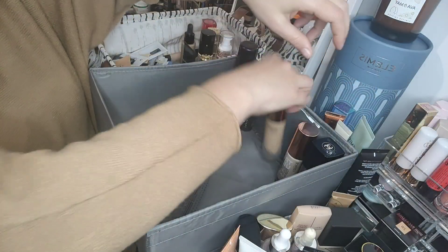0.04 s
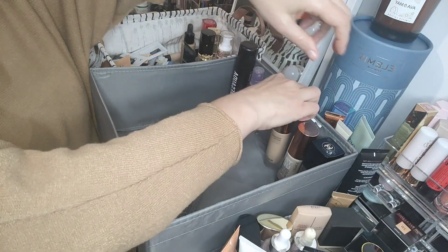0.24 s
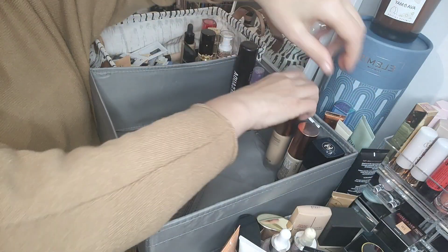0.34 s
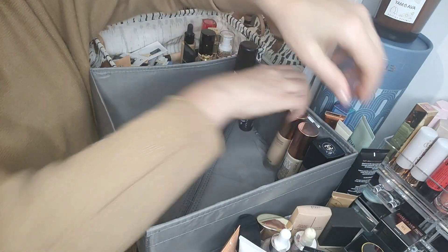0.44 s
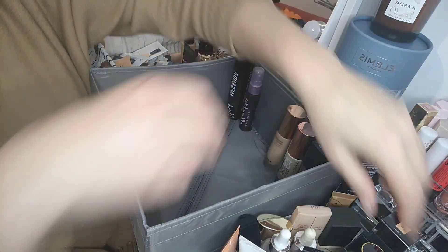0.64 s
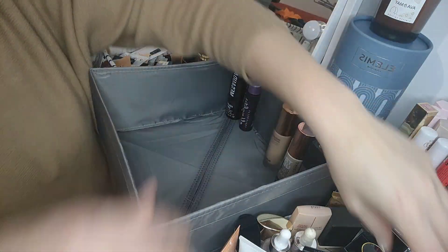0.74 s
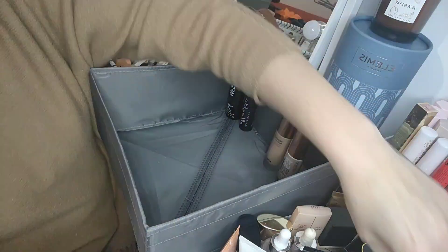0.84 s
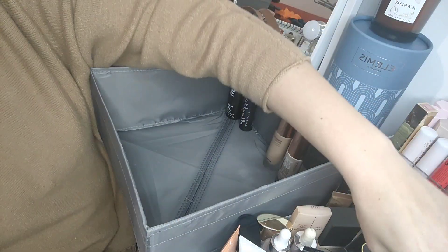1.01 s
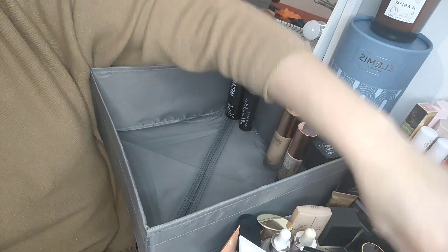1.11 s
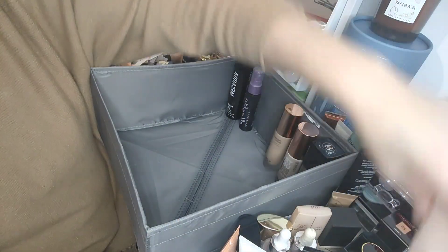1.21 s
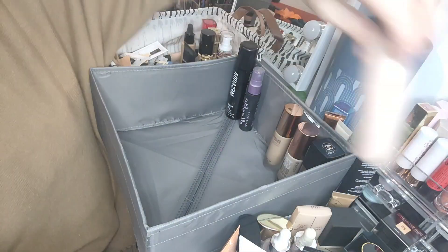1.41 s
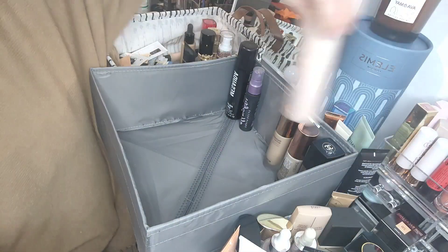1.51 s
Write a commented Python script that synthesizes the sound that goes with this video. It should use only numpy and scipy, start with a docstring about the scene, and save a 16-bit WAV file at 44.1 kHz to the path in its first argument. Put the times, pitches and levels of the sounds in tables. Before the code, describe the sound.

Makeup bottles knock and clink in a fabric storage box as a sleeve rustles softly.

```python
"""Over faint room noise, a makeup bottle is set down hard on the stiff floor of a fabric storage box.
Six soft, dull bumps follow while a sleeve rustles; then a plastic case clacks, a glass bottle clinks
and a hollow container is nudged. Each blow rings the modes of its object, close to the microphone,
and echoes off nearby things and a small room. The sleeve is shaped noise over the arm's low rumble."""
import sys
import numpy as np
from scipy import signal
from scipy.fft import rfft, irfft
from scipy.io import wavfile
from scipy.ndimage import uniform_filter1d

SR = 44100
rng = np.random.default_rng(int(sys.argv[2]) if len(sys.argv) > 2 else 0)


def generate_wav(sig):
    """Save sig (samples, or channels by samples) to the path in sys.argv[1] as 16-bit PCM at SR."""
    pcm = np.round(np.clip(np.atleast_2d(sig).T, -1, 1) * 32767).astype(np.int16)
    wavfile.write(sys.argv[1], SR, pcm)


N = 68355
ROOM_MONO_HZ = 635


def amp(db):
    """Decibels to gain."""
    return 10 ** (np.asarray(db) / 20)


def unit_rms(x):
    """Scales to rms 1."""
    return x / np.sqrt(np.mean(x ** 2) + 1e-20)


def curve_at(points, hz):
    """Reads a table on a log-frequency axis."""
    f, value = np.transpose(points)
    return np.interp(np.log(hz + 1), np.log(f + 1), value)


def panned(x, pan_db):
    """Makes the left channel pan_db louder than the right."""
    return x * amp([[pan_db / 2], [-pan_db / 2]])


def high_pass(x, hz):
    """Second-order high-pass."""
    return signal.sosfilt(signal.butter(2, hz, "high", fs=SR, output="sos"), x)


def diffuse(size, mono_hz):
    """White noise from all around: alike in both channels in the bass, unrelated in the treble."""
    a, b = rfft(rng.standard_normal((2, size)))
    coherence = 1 / (1 + (np.fft.rfftfreq(size, 1 / SR) / mono_hz) ** 2)
    mid, side = a * np.sqrt((1 + coherence) / 2), b * np.sqrt((1 - coherence) / 2)
    return irfft(np.array([mid + side, mid - side]), size)


def noise(colour, mono_hz=ROOM_MONO_HZ):
    """Diffuse noise of a given colour, rms 1."""
    gain = amp(curve_at(colour, np.fft.rfftfreq(N, 1 / SR)))
    return unit_rms(irfft(rfft(diffuse(N, mono_hz)) * gain, N))


# Room noise colour. Each row: frequency in Hz, gain in dB.
ROOM_NOISE_COLOUR = [(30, -4), (170, -5), (400, -14), (1000, -15), (3000, -19.5), (7000, -22.5),
                     (15000, -21.5)]

def room_noise(level_db=-67.5):
    """Steady, bass-heavy background."""
    return amp(level_db) * noise(ROOM_NOISE_COLOUR)


# Standing waves. Each row: frequency in Hz, gain in dB, T60 in seconds.
ROOM_MODES = [(127, 5.5, 0.33), (188.7, 2.5, 0.25), (212.1, 3.5, 0.48), (255.2, -5.5, 0.083),
              (314.4, -3, 0.7), (350.4, 4.5, 0.31), (429.6, 7, 0.2), (489.2, -4, 0.093), (547.5, -1.5, .22),
              (565.6, 3, .36), (637.6, -5.5, 0.12), (803.5, -3.5, 0.098), (893, 4, 0.09), (1104, 2, 0.14)]
# Tail colour. Each row: frequency in Hz, gain in dB.
TAIL_COLOUR = [(60, -27), (200, -5), (400, -7.5), (800, -4.5), (1500, -4), (3000, -5.5), (6000, -6),
               (12000, -10)]
# Tail decay. Each row: frequency in Hz, T60 in seconds.
TAIL_T60 = [(100, 0.61), (500, 0.38), (1500, 0.37), (4000, 0.31), (7000, .3), (12000, 0.15)]

def room_response(rise_s=0.0041):
    """A diffuse tail that dies band by band, plus the room's standing waves."""
    t = np.arange(SR // 2) / SR
    band_hz, frame_s, bands = signal.stft(diffuse(len(t), ROOM_MONO_HZ), SR, nperseg=256)
    t60_s = curve_at(TAIL_T60, band_hz)[:, None]
    decay = amp(curve_at(TAIL_COLOUR, band_hz)[:, None] - 60 * frame_s / t60_s)
    norm_s = 2 * np.log(1000) / SR  # keeps gain independent of T60
    tail = signal.istft(bands * decay * np.sqrt(norm_s / t60_s), SR, nperseg=256)[1][:, :len(t)]
    waves = sum(amp(db - 60 * t / t60) * np.cos(2 * np.pi * hz * t) * norm_s / t60
                for hz, db, t60 in ROOM_MODES)
    return (tail + waves) * (1 - np.exp(-(t / rise_s) ** 2))


def ringing(modes, rise_cycles, contact_hz, widen=1):
    """The modes of an object build up and die away, dulled by a soft contact."""
    t = np.arange(SR // 2) / SR
    ring = np.zeros(len(t))
    for hz, db, t60_s in modes:
        rise = 1 - np.exp(-t * widen * hz / rise_cycles)
        ring -= amp(db - 60 * t * widen / t60_s) * rise * np.cos(2 * np.pi * hz * t)
    pole = np.exp(-2 * np.pi * contact_hz / SR)
    for _ in range(4):
        ring = signal.lfilter([1 - pole], [1, -pole], ring)
    return np.sqrt(widen) * high_pass(ring, hz=274)  # low cut thins the bass of every struck object


def scatter(ring, gain_db=-2, t60_s=0.014):
    """First echoes off the things standing around."""
    t = np.arange(len(ring)) / SR
    clutter = high_pass(diffuse(len(t), mono_hz=404), hz=700) * t * amp(-60 * t / t60_s)
    response = amp(gain_db) * unit_rms(clutter) / np.sqrt(len(t))
    return signal.fftconvolve(ring[None], response, axes=1)


def strikes(modes, blows, room, rise_cycles=0.45, left_lag_s=0.00007):
    """Direct ring, scatter and room for each blow. Defaults are for plastic and glass, right first."""
    out = np.zeros((2, N))
    for start_s, level_db, contact_hz, pan_db, room_db in blows:
        ring = ringing(modes, rise_cycles, contact_hz)
        all_round = ringing(modes, rise_cycles, contact_hz, widen=1.79)  # wider modes from all sides
        size = len(ring)
        delay = np.exp(-2j * np.pi * np.fft.rfftfreq(size, 1 / SR) * left_lag_s)
        left = irfft(rfft(ring) * delay, size)
        direct = panned(np.array([left, ring]), pan_db)
        echoes = scatter(ring) + signal.fftconvolve(all_round[None], amp(room_db) * room, axes=1)
        sound = amp(level_db) * (direct + echoes[:, :size])
        span = out[:, round(start_s * SR):][:, :size]
        span += sound[:, :span.shape[1]]
    return out


# Blows on the box floor. Each row: start in seconds, level in dB, contact cutoff in Hz, pan in dB,
# room send in dB.
KNOCKS = [(0.2472, -4.5, 8700, 1.5, 3.5), (0.4785, -7.5, 716, 1.5, 1), (0.6105, -12, 530, 1.5, -0.5),
          (0.726, -11.5, 842, 1, 2.5), (0.8343, -7.5, 664, 1.5, 1), (.9252, -11.5, 540, 1.5, 1),
          (1.0078, -14, 336, -0.5, 1), (1.0780, -29, 302, 2, 2), (1.1012, -28, 1235, -9, -3),
          (1.191, -40.5, 969.5, 5, 18.5), (1.2122, -17, 580, 0.5, 2)]
# Box floor modes. Each row: frequency in Hz, level in dB, T60 in seconds.
BOX_MODES = [(233.5, -5.5, 0.078), (274.7, -8.5, 0.071), (501.2, -1.5, 0.023), (623, -5, 0.019),
             (836, -3, 0.011), (1160, -17, 0.018), (1506, -22.5, 0.0076), (2157, -10.5, 0.016),
             (3160, -22.5, 0.021), (5450, -18.5, 0.0092)]

def box_knocks(room):
    """The stiff box floor rings low: one hard contact, then soft, dull ones."""
    return strikes(BOX_MODES, KNOCKS, room, rise_cycles=0.14, left_lag_s=0)


# Strokes on the box rim. Each row: centre in seconds, half width in seconds, level in dB.
BRUSHES = [(0.429, 0.013, -44.5), (0.448, 0.011, -51.5), (0.487, 0.0075, -47), (.545, 0.024, -50.5),
           (0.63, 0.019, -76.5), (1, .014, -54.5), (1.03, 0.014, -57.5)]
# Slide and rumble envelopes. Each row: time in seconds, level in dB.
SLIDE_ENVELOPE = [(0, -107), (.25, -63), (.42, -56), (.66, -63), (.85, -57.5), (.97, -63), (1.1, -60.5),
                  (1.4, -75), (1.55, -65.5)]
RUMBLE_ENVELOPE = [(0, -63.5), (.2, -66.5), (.38, -54), (.5, -50), (.62, -57.5), (.95, -58.5), (1.25, -56),
                   (1.42, -63), (1.55, -60.5)]
# Brush, slide and rumble colours. Each row: frequency in Hz, gain in dB.
BRUSH_COLOUR = [(300, -11), (1500, -24.5), (3000, -9.5), (5000, -0.5), (7000, 0.5), (10000, -3),
                (15000, -3.5)]
SLIDE_COLOUR = [(200, -5.5), (1000, -2.5), (2700, 0.5), (5000, 1), (7000, -4.5), (10000, -6),
                (15000, -13.5)]
RUMBLE_COLOUR = [(10, 3.5), (26, -5), (50, -0.5), (85, -10), (170, -10), (300, -17), (700, -29),
                 (2000, -84.5)]

def sleeve(grain_db=2, grain_s=0.0031):
    """Cloth brushes the rim in grainy strokes and slides as the arm reaches across with a low rumble."""
    t = np.arange(N) / SR
    flicker = unit_rms(uniform_filter1d(rng.standard_normal(N), round(grain_s * SR)))
    grain = unit_rms(amp(grain_db * flicker))
    strokes = sum(amp(db) / (1 + ((t - centre_s) / half_s) ** 2) for centre_s, half_s, db in BRUSHES)
    brush = grain * strokes * noise(BRUSH_COLOUR)
    slide = amp(np.interp(t, *np.transpose(SLIDE_ENVELOPE))) * noise(SLIDE_COLOUR)
    rumble = amp(np.interp(t, *np.transpose(RUMBLE_ENVELOPE))) * noise(RUMBLE_COLOUR, mono_hz=61)
    return brush + slide + panned(rumble, pan_db=6)


# Blows on the container. Each row: start in seconds, level in dB, contact cutoff in Hz, pan in dB,
# room send in dB, pitch in Hz.
NUDGES = [(0.435, -30, 500, 3, -6.5, 347), (1.1875, -26, 4890, 10, 4, 679),
          (1.2050, -26.5, 3000, 9.5, -2, 683), (1.3223, -31, 4940, 9.5, -3.5, 631)]
# Container modes. Each row: multiple of the pitch, level in dB, T60 in seconds.
CONTAINER_MODES = [(1, -4, 0.091), (1.74, -4, 0.018), (2.45, -12, 0.047)]

def container_nudges(room):
    """A hollow container rings at a different pitch with each nudge."""
    out = np.zeros((2, N))
    for *blow, pitch_hz in NUDGES:
        modes = [(pitch_hz * ratio, db, t60_s) for ratio, db, t60_s in CONTAINER_MODES]
        out += strikes(modes, [blow], room)
    return out


# Blows on the case. Each row: start in seconds, level in dB, contact cutoff in Hz, pan in dB,
# room send in dB.
CLACKS = [(1.1011, -13.5, 7260, -9, -20), (1.1026, -19.5, 16000, 15, 8.5)]
# Case modes. Each row: frequency in Hz, level in dB, T60 in seconds.
CASE_MODES = [(730, -5.5, 0.0057), (1220, -7, 0.004), (1566, -2.5, 0.012), (1800, -6.5, 0.012),
              (2130, 3, 0.007), (2876, 0, 0.011), (3560, -6.5, 0.018), (5250, 1, 0.0066),
              (7330, -12.5, 0.014), (9100, -17, 0.017), (11500, -22, .010)]

def case_clack(room):
    """Two contacts on fast-damped plastic merge into one clack."""
    return strikes(CASE_MODES, CLACKS, room)


# Blows on the bottle. Each row: start in seconds, level in dB, contact cutoff in Hz, pan in dB,
# room send in dB.
CLINKS = [(1.1848, -10.5, 19000, 10, 2.5), (1.3045, -34, 13900, 1.5, -14.5)]
# Bottle modes. Each row: frequency in Hz, level in dB, T60 in seconds.
GLASS_MODES = [(1316, -22, 0.031), (1727, -8, 0.0071), (3380, -6, 0.0079), (3935, 2, 0.0058),
               (4690, -1, 0.0037), (5205, 5, 0.0039), (6650, -10, 0.0083), (7700, -35, .2),
               (9360, -34.5, 0.26), (12550, -34, 0.16)]

def glass_clinks(room):
    """Hard contacts on glass: a bright tick, then faint high modes ring on."""
    return strikes(GLASS_MODES, CLINKS, room)


def scene():
    """Struck objects in one room, with the sleeve and room noise."""
    room = room_response()
    objects = box_knocks(room) + case_clack(room) + glass_clinks(room) + container_nudges(room)
    return objects + sleeve() + room_noise()


# Microphone colour. Each row: frequency in Hz, gain in dB.
MIC_COLOUR = [(20, 1), (6000, -5), (7300, -5.5), (8200, -14), (10000, -14), (12500, -20), (15000, -24.5)]

def record(dry, band_limit_hz=15100):
    """Minimum-phase microphone colour, then the band limit."""
    size = 4096
    log_gain = np.log(amp(curve_at(MIC_COLOUR, abs(np.fft.fftfreq(size, 1 / SR)))))
    mic_taps = np.fft.ifft(np.exp(np.conj(signal.hilbert(log_gain)))).real[:size // 2]
    coloured = signal.fftconvolve(dry, mic_taps[None], axes=1)[:, :dry.shape[1]]
    low_pass = signal.firwin(511, band_limit_hz, window=("kaiser", 9), fs=SR)
    return signal.oaconvolve(coloured, low_pass[None], "same")


dry = scene()
out = record(dry)
generate_wav(out)
```